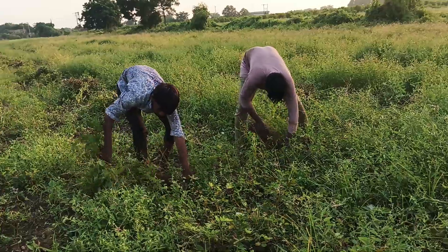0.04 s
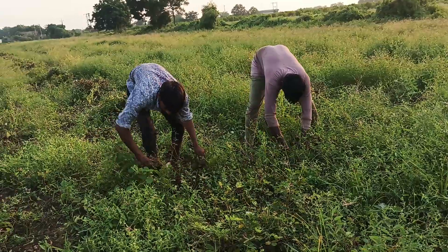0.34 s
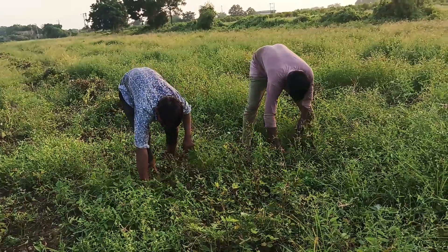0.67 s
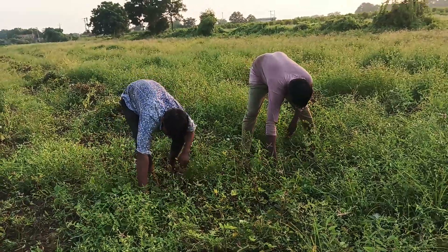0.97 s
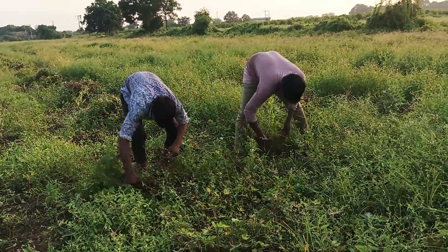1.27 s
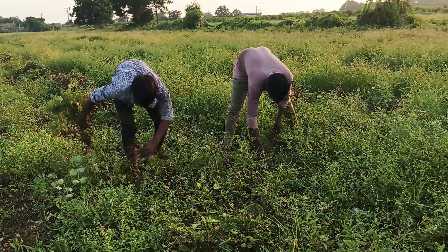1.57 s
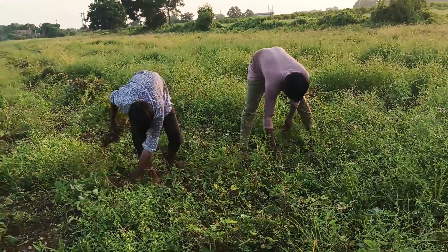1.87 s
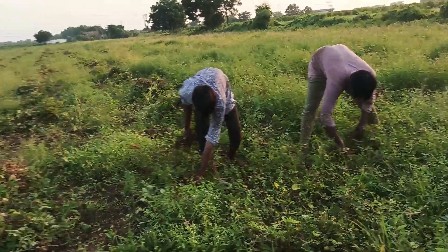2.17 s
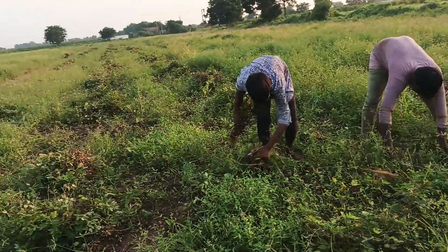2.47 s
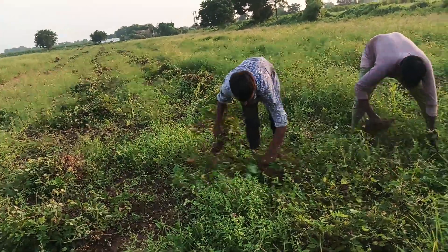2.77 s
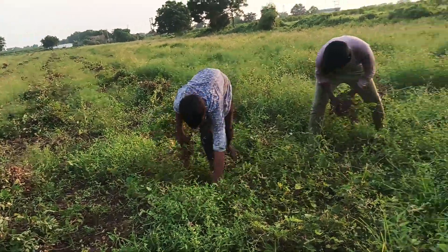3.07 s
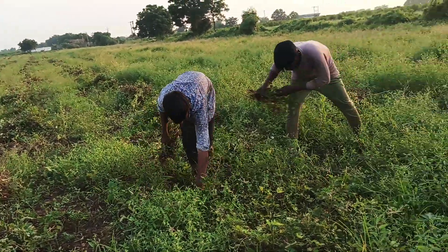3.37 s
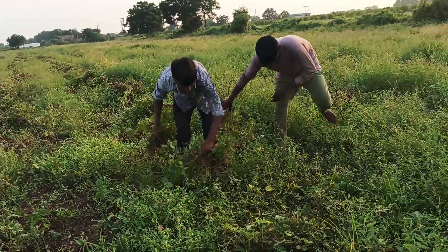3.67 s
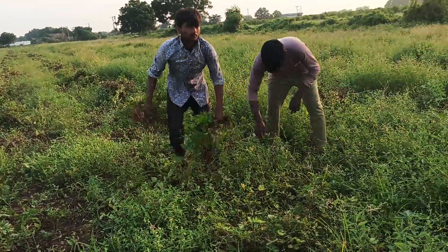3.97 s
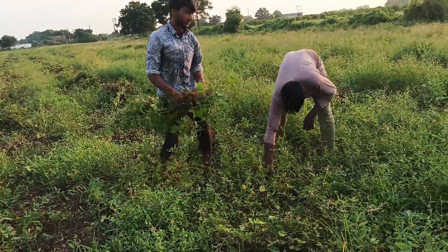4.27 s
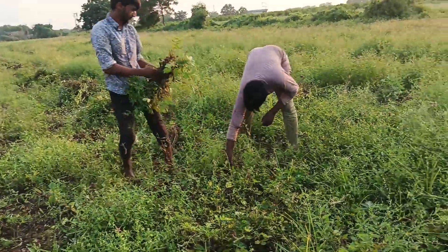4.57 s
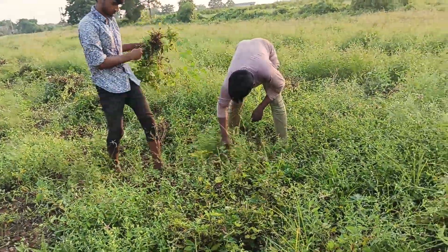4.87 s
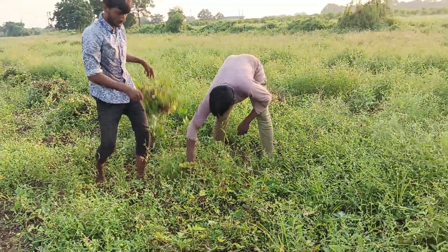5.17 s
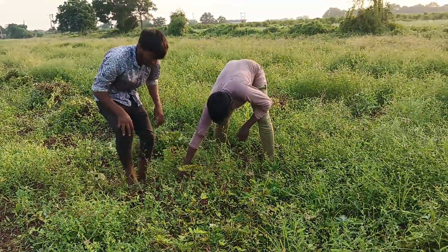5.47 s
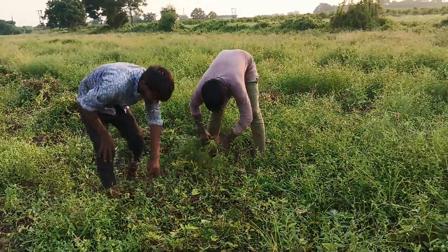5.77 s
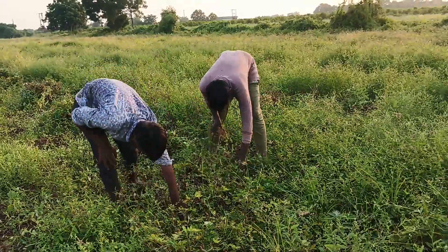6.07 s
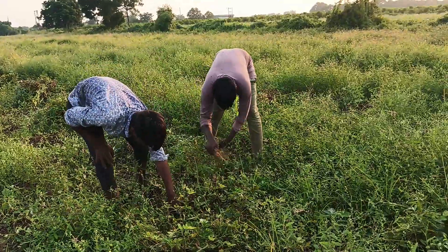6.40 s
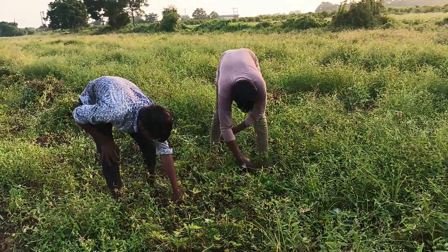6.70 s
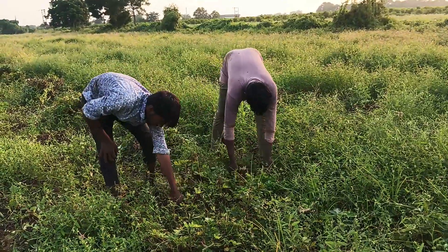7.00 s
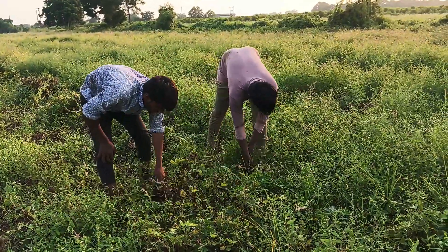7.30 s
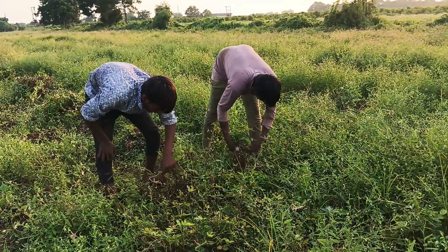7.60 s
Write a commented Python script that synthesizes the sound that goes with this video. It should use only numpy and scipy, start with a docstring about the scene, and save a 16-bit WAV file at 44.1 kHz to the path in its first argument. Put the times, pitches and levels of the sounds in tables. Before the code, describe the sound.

Close, dry rustling and crackling runs throughout as crop plants are tugged out of the ground, broken by snapping stalks and a few dull thuds on soil. A bright swish of foliage comes first, followed by a longer rip of roots and more short pulls. Far across the open field an engine rumbles and slowly speeds up, with a faint drone, a light breeze and occasional small bird chirps.

```python
"""Two workers pull crop plants by hand in an open field: stems and roots tear with a crackle of tiny
fractures, dry leaves crinkle, stalks snap and a bundle swishes through the standing crop.
Feet shuffle in loose soil, and feet and clods thud on it. Far off, a single-cylinder engine rings its
exhaust with each firing and slowly speeds up. Birds call faintly over a soft hiss, a far drone and
a low breeze."""
import sys
import numpy as np
from scipy import signal
from scipy.fft import rfft, irfft, next_fast_len
from scipy.io import wavfile
from scipy.ndimage import uniform_filter1d, map_coordinates

SR = 44100
rng = np.random.default_rng(int(sys.argv[2]) if len(sys.argv) > 2 else 0)


def put_to_file(sound):
    """Save the sound as 16-bit audio at rate SR, in the file named by the first command-line argument."""
    columns = np.atleast_2d(sound).T  # one column per channel
    safe = np.clip(columns, -1, 1)
    whole_steps = np.round(safe * 32767)
    wavfile.write(sys.argv[1], SR, whole_steps.astype(np.int16))


N = 337100
TIME = np.arange(N) / SR


def amp(db):
    """Decibels to gain."""
    return 10 ** (np.asarray(db) / 20)


def unit(x):
    """Scale to rms 1."""
    return x / np.sqrt(np.mean(x ** 2) + 1e-20)


def curves(rows):
    """One value per sample for each column after the time, joined by straight lines."""
    times, *columns = np.transpose(rows)
    return [np.interp(TIME, times, column) for column in columns]


def wobble(rate):
    """A smooth random curve, rate knots a second."""
    return map_coordinates(rng.standard_normal(int(N * rate / SR) + 4), [TIME * rate])


def filtered(x, response):
    """Filter x by a gain that is a function of frequency in Hz."""
    size = next_fast_len(N + SR // 2)
    return irfft(rfft(x, size) * response(np.fft.rfftfreq(size, 1 / SR)), size)[:N]


def coloured(x, spectrum):
    """EQ x with (Hz, dB) points on a log axis, at rms 1."""
    points_hz, db = np.transpose(spectrum)
    return unit(filtered(x, lambda hz: amp(np.interp(np.log(hz + 1), np.log(points_hz), db))))


def patchy(x, depth_db):
    """Keep the colour shifting with gains that wander over pitch and time."""
    spectra = signal.stft(x, nperseg=512)[2]
    gains = rng.standard_normal(spectra.shape)
    for _ in range(2):
        gains = uniform_filter1d(uniform_filter1d(gains, size=3, axis=0), size=10, axis=1)
    return signal.istft(spectra * amp(depth_db * unit(gains)), nperseg=512)[1][:N]


def add(track, s, sound):
    """Mix a sound into the track at time s."""
    start = max(round(s * SR), 0)
    part = track[start:start + len(sound)]
    part += sound[:len(part)]


def swell(s, rise, fall, db, drop_db=8.5, roundness=1.22):
    """Envelope of one effort: it peaks at s and is drop_db lower one rise before or one fall after."""
    away = np.maximum((s - TIME) / max(rise, .005), (TIME - s) / max(fall, .005))
    return amp(db - drop_db * np.minimum(away, 10) ** roundness)


def together(gains):
    """Unrelated rustles add in power."""
    return np.sqrt(sum(gain ** 2 for gain in gains))


def crackle(rate, spread_db, burst_db, rub_db):
    """Tiny fractures of uneven size and pitch, in sudden bursts, over smooth rubbing."""
    def ticks():
        clicks = (rng.random(N) < rate / SR) * rng.choice([-1, 1], N)
        return clicks * amp(spread_db * np.minimum(rng.standard_normal(N), 2))

    grains = np.zeros(N)
    bands_hz = np.geomspace(600, 16000, num=9)
    broad = ticks()
    for band in np.eye(len(bands_hz)):
        # some fractures sound in every band, others only around their own pitch
        grains += filtered(1.1 * broad + ticks(), lambda hz: np.interp(hz, bands_hz, band))
    # a fibre gives way at once, and the crackle that it sets off dies down
    slips = signal.lfilter([1], [1, -np.exp(-1 / (0.0073 * SR))], rng.random(N) < 70 / SR)
    bursts = amp(burst_db * np.minimum(slips, 2))
    rubbing = amp(rub_db) * rng.standard_normal(N)
    return unit(patchy((unit(grains) + rubbing) * bursts, depth_db=2.0))


# The mid-range bite of stems and the crisp top of leaves. Each row: frequency in Hz, gain in dB.
STEM_EQ = [(300, -19), (700, -15.5), (1200, -6.5), (1800, 1), (2800, 0), (4100, -2), (5400, -6.5),
           (6800, -10), (9000, -6.5), (11500, -10), (16000, -38)]
LEAF_EQ = [(2000, -5.5), (5000, -1.5), (7000, -7), (8200, 1), (9200, 7), (10600, 1), (13000, 3.5),
           (16000, -3)]
# Tugs at a handful of plants. Each row: moment of greatest strain, build-up and let-go in seconds,
# relative stem level and relative leaf level in dB.
PLANT_TUGS = [(0.0, .05, 0.089, -37, -42.5), (.14, .08, 0.23, -44, -48), (.41, 0.037, 0.27, -44.5, -47.5),
              (.62, 0.14, 0.088, -42, -46.5), (.9, .09, 0.066, -42, -40.5), (1.18, .1, .1, -43, -44),
              (1.43, 0.25, 0.22, -41, -52), (1.85, 0.045, 0.13, -44.5, -64), (2.03, 0.034, 0.026, -47, -47),
              (2.12, 0.034, 0.17, -47.5, -53), (2.47, 0.07, 0.081, -42, -51),
              (2.58, 0.054, 0.1, -43.5, -44), (2.83, 0.18, 0.078, -35, -41), (3.05, 0.17, 0.24, -44, -47.5),
              (3.28, 0.027, .09, -44, -53), (3.53, 0.051, 0.06, -42, -46),
              (3.69, 0.15, 0.072, -45.5, -45.5), (3.88, 0.16, 0.11, -40, -44),
              (4.12, 0.13, 0.14, -44.5, -53), (4.41, 0.084, 0.093, -40, -45.5),
              (4.53, 0.067, 0.056, -52, -46), (4.82, 0.24, 0.12, -45, -46.5),
              (4.93, 0.058, 0.067, -45, -44), (5.11, 0.034, 0.049, -46.5, -49), (5.45, 0.063, .1, -39, -45),
              (5.69, .05, 0.066, -49, -58), (5.8, 0.092, 0.085, -44.5, -46),
              (5.89, 0.041, 0.047, -44.5, -52), (6.11, 0.087, 0.083, -40.5, -41),
              (6.27, 0.035, 0.16, -45, -47.5), (6.5, 0.068, 0.032, -39, -39.5),
              (6.56, 0.05, 0.047, -37, -44), (6.83, 0.056, .12, -41.5, -45.5),
              (7.01, .03, 0.057, -47, -48.5), (7.3, 0.12, 0.17, -39, -44.5),
              (7.52, 0.054, 0.16, -40.5, -50)]


def pulling(stir_db=-56):
    """At each tug stems tear with a coarse crackle while the leaves crinkle finely."""
    stir = amp(stir_db + 3.55 * wobble(18))  # the foliage never quite comes to rest
    stem_gain = together([stir] + [swell(s, rise, fall, db) for s, rise, fall, db, _ in PLANT_TUGS])
    leaf_gain = together([stir] + [swell(s, rise, fall, db) for s, rise, fall, _, db in PLANT_TUGS])
    stems = coloured(crackle(rate=900, spread_db=3, burst_db=3.5, rub_db=0.5), STEM_EQ)
    leaves = coloured(crackle(rate=2600, spread_db=4.5, burst_db=4.0, rub_db=-1.5), LEAF_EQ)
    return amp(-0.48) * stem_gain * stems + amp(3.0) * leaf_gain * leaves


# The engine picking up speed. Each row: time in seconds, firings per second.
ENGINE_SPEED = [(0, 16.45), (1.5, 17.38), (3, 17.9), (3.7, 17.5), (6, 19.98), (7.64, 20.27)]
# The exhaust's boom. Each row: pitch in Hz, relative level in dB, seconds to fade by 60 dB.
EXHAUST_MODES = [(90.3, -4.5, 0.11), (109.5, 3, 0.076), (157, -2.5, 0.051), (216, -12, 0.026)]
# The engine's fader. Each row: time in seconds, level in dB.
ENGINE_FADER = [(0, -51), (.6, -50), (1.4, -48.5), (2.25, -47.5), (2.6, -50), (3.3, -51.5), (4.1, -49.5),
                (4.7, -47), (5.6, -48), (6.8, -47), (7.64, -48)]


def engine(idle_rate=17.3, brighten_db=2, jitter_s=0.0016, attack_s=0.0093):
    """Each firing rings the exhaust, brighter at speed; distance smears it into a throbbing rumble."""
    rate, = curves(ENGINE_SPEED)
    cycles = np.cumsum(rate) / SR + .55  # starts mid-cycle
    firings = np.interp(np.arange(1, cycles[-1]), cycles, TIME)
    thumps, t = np.zeros(N), np.arange(SR // 6) / SR
    attack = 1 - np.exp(-t / attack_s)
    pivot_hz = EXHAUST_MODES[1][0]
    for s in firings:
        db_per_octave = brighten_db * (np.interp(s, TIME, rate) - idle_rate)
        ring = np.zeros(len(t))
        for hz, db, t60 in EXHAUST_MODES:
            mode_db = db + db_per_octave * np.log2(hz / pivot_hz) + rng.normal(0, 2.3)
            mode_hz = hz * (1 + rng.normal(0, 0.048))
            ring += amp(mode_db - 60 * t / t60) * np.sin(2 * np.pi * mode_hz * t)
        add(thumps, s + rng.normal(0, jitter_s), amp(rng.normal(0, 0.5)) * ring * attack)
    thumps = unit(filtered(thumps, lambda hz: hz ** 4 / (hz ** 4 + 55 ** 4)))  # low cut at 55 Hz
    smear_eq = [(35, -28), (60, -18), (100, -0.5), (150, -15.5), (260, -15.5), (600, -39)]
    smear = coloured(rng.standard_normal(N), smear_eq)
    drift_db = wobble(6.4)  # the level wanders on the air
    return amp(curves(ENGINE_FADER)[0] + drift_db) * unit(thumps + amp(-5.5) * smear)


# The tone of the steady background hiss, with the microphone's bright peak near 9 kHz.
# Each row: frequency in Hz, gain in dB.
HISS_EQ = [(88, -24), (150, 0.5), (269, -10), (660, -9.5), (901, -6.5), (1010, -4.5), (1330, -8),
           (2680, -11), (4040, -14.5), (6570, -19.5), (9160, -9.5), (10700, -17.5), (13500, -19),
           (15800, -15.5)]


def hiss():
    """A soft bed of background hiss whose colour keeps shifting."""
    gain = amp(-48.5 + 0.45 * wobble(3.06))
    return gain * coloured(patchy(rng.standard_normal(N), depth_db=3.0), HISS_EQ)


# The drone's two notes. Each row: centre in Hz, width in Hz, relative level in dB.
DRONE_BANDS = [(804, 43, -0.5), (903.6, 62, 6)]
# The drone's fader. Each row: time in seconds, level in dB.
DRONE_FADER = [(0, -56.5), (1.5, -55), (3.4, -53), (4.4, -56), (6, -55.5), (7.64, -55.5)]


def drone():
    """Narrow bands of noise waver in the distance."""
    def bands(hz):
        return sum(amp(db) / (1 + (2 * (hz - centre) / width) ** 2) for centre, width, db in DRONE_BANDS)

    gain = amp(curves(DRONE_FADER)[0] + 1.2 * wobble(16))
    return gain * unit(filtered(rng.standard_normal(N), bands))


# The strength of the breeze. Each row: time in seconds, level in dB.
BREEZE_FADER = [(0, -72), (3.8, -75.5), (4.2, -62), (5.7, -67), (6.3, -73), (7.64, -70)]


def breeze(gust_db=2.5, gust_rate=5):
    """Light gusts on the microphone make a deep rumble."""
    gain = amp(curves(BREEZE_FADER)[0] + gust_db * wobble(gust_rate))
    return gain * coloured(rng.standard_normal(N), [(12, -40), (25, -25), (38, 0), (70, -7), (150, -24)])


# The shape of a bird's whistle. Each row: time in seconds, pitch in Hz, level in dB.
WHISTLE_GLIDE = [(0, 797, -64), (.08, 810, -49), (.14, 840, -53), (.19, 898, -46), (.25, 941, -62),
                 (.32, 935, -87)]


def bird_whistle():
    """A far bird gives one pure, rising note with a flickering level."""
    hz, db = curves(WHISTLE_GLIDE)
    tone = np.sin(2 * np.pi * np.cumsum(hz) / SR)
    return amp(db + 1.3 * wobble(43)) * tone * (TIME < WHISTLE_GLIDE[-1][0])


# Footwork in loose soil. Each row: peak time in seconds, rise and fall time in seconds,
# relative level in dB.
FOOT_SHUFFLES = [(.02, .05, -54.5), (1.27, 0.042, -50), (1.48, 0.17, -50), (1.924, 0.23, -52.5),
                 (2.478, 0.027, -43), (2.807, 0.049, -53), (3.528, .03, -53.5), (4.78, 0.13, -51.5),
                 (5.55, .15, -58), (6.53, .08, -51.5), (6.857, 0.073, -50.5), (7.264, 0.22, -50.5)]


def shuffling():
    """Soft soil crumbles under shifting feet."""
    soil_eq = [(30, -41), (130, -17), (240, -2.5), (450, 1.0), (750, -16.5), (2000, -10), (6000, -50)]
    crumbs = coloured(crackle(rate=400, spread_db=1.5, burst_db=8.0, rub_db=-2.5), soil_eq)
    gain = together(swell(s, ramp, ramp, db) for s, ramp, db in FOOT_SHUFFLES)
    return amp(-2.5) * gain * crumbs


# Sharp accents of breaking stalks. Each row: start in seconds, relative level in dB, pitch in Hz,
# seconds for the ring to fade by 60 dB.
STALK_SNAPS = [(0.182, -18, 1300, 0.0026), (0.631, -30, 4380, .014), (1.362, -15, 2600, 0.0033),
               (1.487, -18, 2180, 0.0022), (1.743, -31, 2400, .003), (1.837, -21, 2144, 0.0023),
               (2.026, -20.5, 2070, 0.0035), (3.278, -33, 2200, .003), (3.522, -26.5, 2240, 0.01),
               (3.53, -24, 4750, 0.008), (3.791, -23.5, 4370, 0.0058), (4.402, -24, 3000, .002),
               (5.175, -28.5, 4000, 0.0038), (5.627, -24, 4200, 0.0011), (6.099, -31, 2500, .003),
               (6.447, -25.5, 2620, 0.0067), (7.198, -15.5, 2300, 0.0029), (7.531, -26, 4500, 0.0058)]


def snapping(crack_db=-8, crack_t60=.004, splinter_db=-21, splinter_t60=0.071):
    """A stalk breaks: a few cycles at its own pitch, a thin crack and a short splintering tail."""
    track, t = np.zeros(N), np.arange(SR // 10) / SR
    for s, db, hz, t60 in STALK_SNAPS:
        ring = np.sin(2 * np.pi * hz * t) * amp(-60 * t / t60)
        crack = amp(crack_db - 60 * t / crack_t60)
        splinter = amp(splinter_db - 60 * t / splinter_t60)
        snap = ring + (crack + splinter) * rng.standard_normal(len(t))
        # a thin stalk radiates mostly around its own pitch
        stalk = signal.butter(2, [hz / 2.9, min(hz * 2.6, SR / 3)], "band", fs=SR, output="sos")
        add(track, s, amp(db - 1.0) * signal.sosfilt(stalk, snap))
    return track


# The rasp of roots. Each row: frequency in Hz, gain in dB.
ROOT_EQ = [(1000, -27), (2500, 0), (4000, -6), (5300, 2), (7000, -8), (9000, -16), (15000, -3)]
# Roots giving way. Each row: moment of greatest strain, build-up and let-go in seconds, level in dB.
ROOT_TEARS = [(.9, .08, .08, -41.5), (2.83, 0.28, .08, -36.5), (4.41, .05, .05, -44),
              (5.465, .05, .06, -56), (6.11, .06, .06, -53), (6.49, .05, .04, -46)]


def uprooting():
    """Tough roots tear loose in a dense crackle that swells with the strain."""
    roots = coloured(crackle(rate=1800, spread_db=5, burst_db=3.0, rub_db=2), ROOT_EQ)
    return together(swell(*tear) for tear in ROOT_TEARS) * roots


# The sheen of the swish. Each row: frequency in Hz, gain in dB.
SWISH_EQ = [(700, -27), (1300, -8), (2000, -0.5), (3000, -3.5), (4100, -6.5), (5200, -14), (6300, -7),
            (7400, -3.5), (8700, 0), (9700, -3), (11000, -26), (16000, -11)]
# A bundle swept through the crop, one list a stroke. Each row: time in seconds, relative level in dB.
BUNDLE_STROKES = [
    [(1.1, -75), (1.25, -44), (1.36, -42.5), (1.425, -35.5), (1.5, -38), (1.565, -37.5), (1.59, -72)],
    [(1.79, -51), (1.87, -43.5), (1.94, -50), (1.97, -59)],
]


def sweeping():
    """Many dry heads brush past each other in a bright swish."""
    gain = sum(amp(np.interp(TIME, *np.transpose(stroke), left=-120, right=-120))
               for stroke in BUNDLE_STROKES)
    swish = coloured(crackle(rate=2500, spread_db=3.5, burst_db=4.0, rub_db=4), SWISH_EQ)
    return amp(3.5) * gain * swish


# Feet and clods landing. Each row: start in seconds, relative level in dB.
SOIL_THUDS = [(1.223, -34), (3.519, -38), (4.656, -40), (5.393, -56), (5.548, -45), (6.106, -53),
              (7.209, -46), (7.274, -40)]


def thudding(t60=0.1):
    """Soft soil takes each blow with a dull puff."""
    blows = sum(amp(db - 60 * np.abs(TIME - s) / t60) * (TIME >= s) for s, db in SOIL_THUDS)
    puff = coloured(rng.standard_normal(N), [(30, -41), (130, -8), (330, -9), (700, -26), (2500, -40)])
    return amp(-6.0) * blows * puff


# A small bird's calls. Each row: loudest moment in seconds, level in dB.
BIRD_CHIRPS = [(2.141, -52), (2.198, -50), (3.575, -55), (3.645, -51), (5.19, -53), (5.256, -48.5),
               (6.425, -49), (6.485, -47)]


def bird_chirps(centre_hz=5330, fall_hz_per_s=23000, fade_s=0.018):
    """Short chirps glide down, and moving air makes them flutter."""
    song, t = np.zeros(N), np.arange(-SR // 20, SR // 20) / SR
    phase = 2 * np.pi * (centre_hz - fall_hz_per_s * t / 2) * t
    chirp = np.exp(-np.abs(t) / fade_s) * np.sin(phase)
    for s, db in BIRD_CHIRPS:
        add(song, s + t[0], amp(db) * chirp)
    return song * amp(3.9 * wobble(250))


def scene():
    """Close handwork over a distant backdrop, in mono, with no walls to answer."""
    work = pulling() + shuffling() + snapping() + uprooting() + sweeping() + thudding()
    backdrop = engine() + hiss() + drone() + breeze() + bird_whistle() + bird_chirps()
    return (work + backdrop)[None]


def record(dry, top_hz=15750):
    """A brick-wall high cut takes off the very top."""
    return np.array([filtered(channel, lambda hz: hz < top_hz) for channel in dry])


dry = scene()
out = record(dry)
put_to_file(out)
```